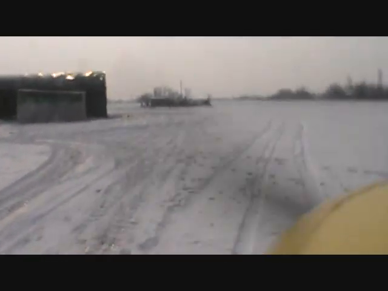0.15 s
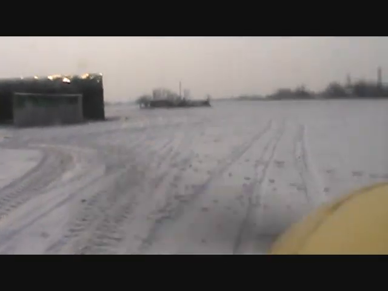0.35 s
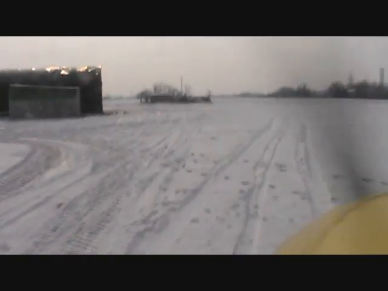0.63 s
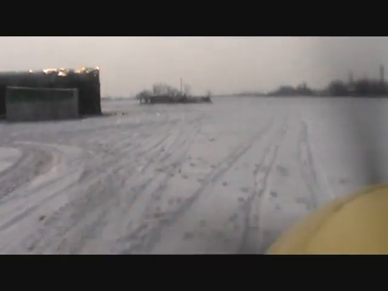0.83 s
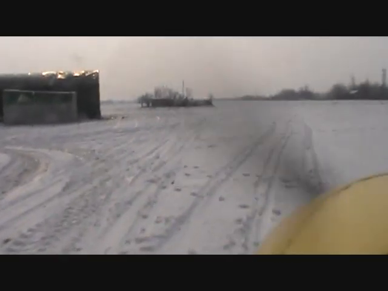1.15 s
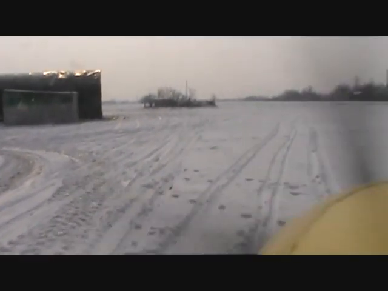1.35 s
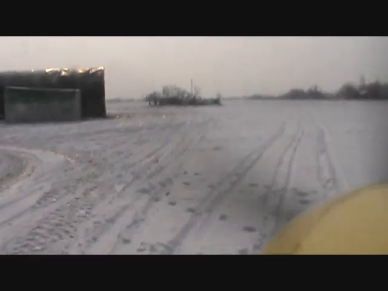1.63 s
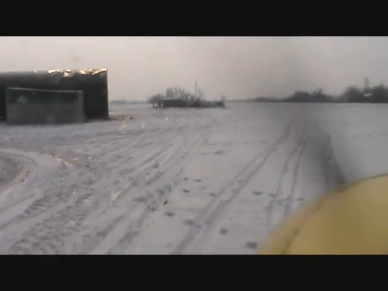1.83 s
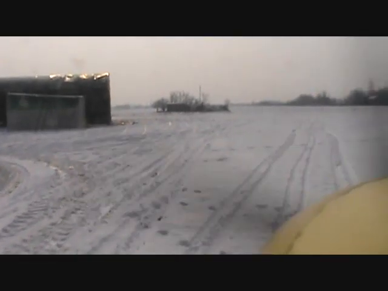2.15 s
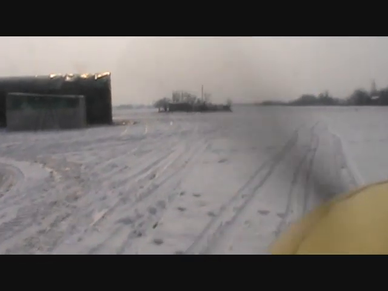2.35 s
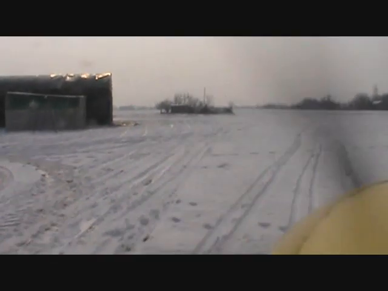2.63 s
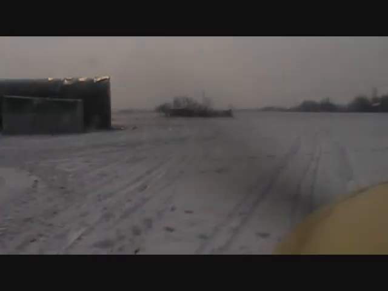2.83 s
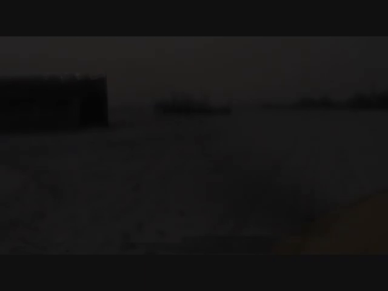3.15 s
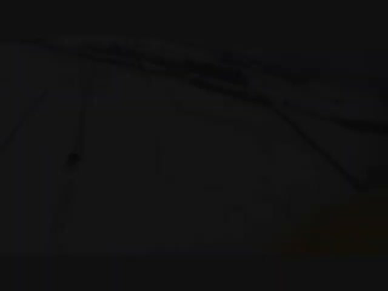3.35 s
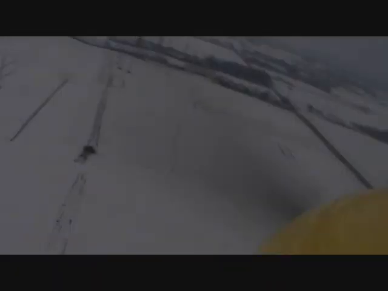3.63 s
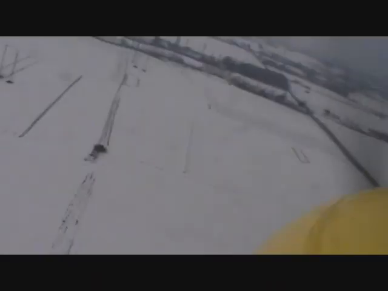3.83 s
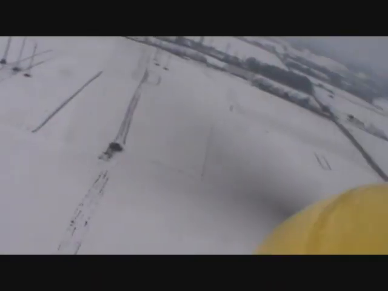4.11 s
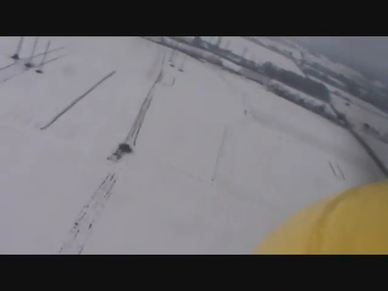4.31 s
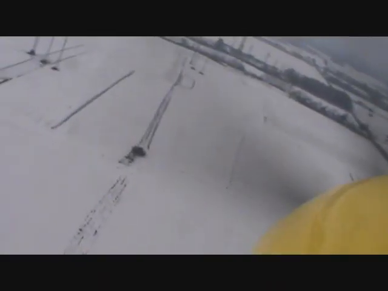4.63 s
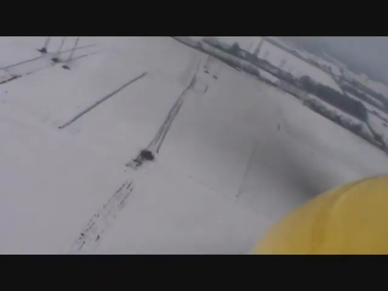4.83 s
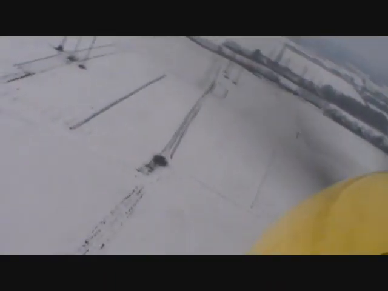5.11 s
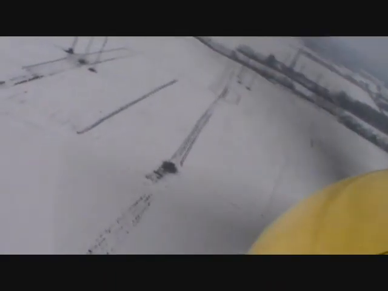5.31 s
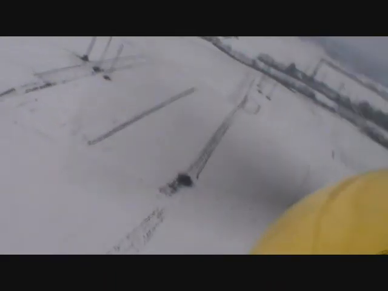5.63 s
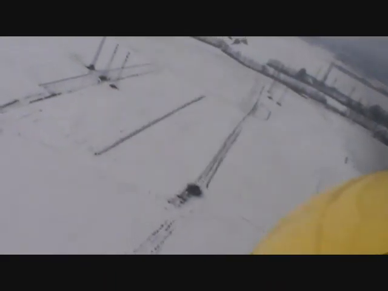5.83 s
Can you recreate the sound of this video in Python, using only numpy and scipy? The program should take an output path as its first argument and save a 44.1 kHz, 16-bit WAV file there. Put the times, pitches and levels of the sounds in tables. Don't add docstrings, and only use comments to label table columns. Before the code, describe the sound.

Inside a light aircraft standing on snow, the engine drones low and knocks the airframe while propeller wash roars. A loose metal bracket rattles in quick, irregular bursts. The sound fades and cuts to silence just after three seconds, then the engine fades in at higher pitch in flight, smoother and windier, with sparser rattles. Close stereo cockpit microphone with levelled loudness and slightly rounded peaks.

```python
import sys
import numpy as np
from scipy import signal
from scipy.fft import rfft, irfft, next_fast_len
from scipy.io import wavfile
from scipy.ndimage import uniform_filter1d, map_coordinates

SR = 44100
rng = np.random.default_rng(int(sys.argv[2]) if len(sys.argv) > 2 else 0)


def generate_wav(sig):
    pcm = np.round(np.clip(np.atleast_2d(sig).T, -1, 1) * 32767).astype(np.int16)
    wavfile.write(sys.argv[1], SR, pcm)


def invert_db(x):
    u = np.asarray(x, float) / 20
    return 10 ** u


N = 263276
GROUND, AIR = 0, 1
CUT_S = 3.1918

# (time [s], firing rate [Hz])
RUN_UP_SPEED = [(0.0, 61.32), (0.29, 61.06), (0.58, 62.93), (1.16, 65.35), (1.45, 65.89), (1.74, 65.88),
                (2.03, 65.3), (2.32, 65.21), (2.9, 66.0), (3.19, 66.1)]
# (time [s], firing rate [Hz])
FLIGHT_SPEED = [(3.45, 75.12), (4.17, 75.8), (4.53, 75.69), (4.88, 76.4), (5.24, 76.07), (5.6, 76.83),
                (5.96, 75.57)]


def unit(x):
    return x / np.sqrt(np.mean(x ** 2) + 1e-20)


def along(points, hz):
    f, v = np.transpose(points)
    return np.interp(np.log(hz + 1), np.log(f + 1), v)


def curves(rows, t_s):
    s, *cols = np.transpose(rows)
    return [np.interp(t_s, s, c) for c in cols]


def wobble(rate_hz):
    knots = rng.standard_normal(int(N * rate_hz / SR) + 4)
    return map_coordinates(knots, [np.arange(N) * rate_hz / SR])


def patches(shape, bins, frames):
    field = uniform_filter1d(rng.standard_normal(shape), bins, axis=0)
    return unit(uniform_filter1d(field, frames, axis=1))


def filtered(x, response):
    m = next_fast_len(N + SR // 4)
    return irfft(rfft(x, m) * response(np.fft.rfftfreq(m, 1 / SR)), m)[..., :N]


def modes(f, table):
    total = 0
    for k, (centre, width, db) in enumerate(table):
        damping = 1j * f * width
        total = total + (-1) ** k * invert_db(db) * damping / (centre * centre - f * f + damping)
    return total


def engine(view, t):
    # (multiple of firing rate [1], level [dB]); panels lift the high ones
    weak_orders = [
        [(.5, -25), (1.5, -17), (3, -19), (4, -25), (5, -21), (9, -23), (10, -27), (11.75, -28), (12.5, -27),
         (13, -28), (16, -33), (21, -35)],
        [(.5, -26), (.75, -15), (1.75, -24), (2.25, -22), (4.4, -21), (7.5, -26), (10.75, -27), (11, -24),
         (11.25, -25), (12, -32), (13, -32)],
    ]
    # (time [s], level [dB])
    second_swell = [
        [(0, -11.5), (1.9, -8.5)],
        [(4.4, -12), (5.6, -7)],
    ]
    # (knock level [dB], every second knock [dB], delay [firings])
    knocks = [
        (-19.5, -3.5, .3),
        (-25, 0, .3),
    ]
    # (centre [Hz], width [Hz], level [dB])
    airframe_modes = [(940, 200, -8), (1348, 54, 1.5), (1532, 120, 3.5), (1628, 86, 3.5)]
    first_db = (-6.5, -12.5)[view]
    start_turns = (.164, 1.556)[view]

    speed = (RUN_UP_SPEED, FLIGHT_SPEED)[view]
    rate_hz = curves(speed, t)[0]
    second_db = curves(second_swell[view], t)[0]
    turns = np.cumsum(rate_hz) / SR
    turns += start_turns - turns[round(speed[0][0] * SR)]

    def tone(order, db, lead_rad):
        level = np.sqrt(2) * invert_db(db + 0.89 * wobble(7.4))
        return level * np.cos(2 * np.pi * order * turns + lead_rad + 0.11 * np.sqrt(order) * wobble(10))

    drone = tone(1, first_db + .1, 0) + tone(2, second_db - .7 + 1.6 * wobble(14), 0.8)
    drone += sum(tone(order, db, rng.uniform(0, 2 * np.pi)) for order, db in weak_orders[view])

    knock_db, second_knock_db, delay = knocks[view]
    firing = np.floor(turns - delay).astype(int)
    scatter_db = rng.normal(0, 0.4, N // 300)[firing % (N // 300)]
    size = invert_db(scatter_db + second_knock_db * (firing % 2))
    since_firing_s = ((turns - delay) % 1) / rate_hz
    blow = size * invert_db(-60 * since_firing_s / 0.008)
    snap = 8 * size * np.diff(firing, prepend=firing[0])
    rough = rng.standard_normal(N) + 0.15 * rng.standard_normal((2, N))
    knock = filtered(snap + blow * rough, lambda f: modes(f, airframe_modes))
    return drone + invert_db(knock_db) * unit(knock)


def rush(response, patchy_db):
    z = signal.stft(rng.standard_normal((2, N + 512)), nperseg=512)[2]
    z *= invert_db(patchy_db * patches(z.shape[1:], 8, 5))
    return unit(filtered(signal.istft(z, nperseg=512)[1][:, :N], response))


def spread(pair):
    # (frequency [Hz], left-right correlation [1])
    alike = [(30, 0.93), (60, 0.66), (130, 0.51), (290, 0.66), (640, 0.44), (1410, 0.51), (3100, 0.58),
             (6820, 0.49), (15000, 0.61)]
    # (frequency [Hz], share of the difference that is the same sound drifting across [1])
    eddies = [(30, 0.79), (125, 0.8), (300, 0.96), (700, .6), (2000, .4), (6000, .2)]
    hz, _, (first, second) = signal.stft(pair, SR, nperseg=1024)
    turn_rad = np.arccos(np.clip(along(alike, hz), -1, 1))[:, None] / 2
    share = np.clip(along(eddies, hz), 0, 1)[:, None]
    drift = 1j * patches(first.shape, bins=9, frames=60)
    mid = np.cos(turn_rad) * first
    side = np.sin(turn_rad) * (share * drift * first + np.sqrt(1 - share ** 2) * second)
    return signal.istft(np.array([mid + side, mid - side]), SR, nperseg=1024)[1][:, :N]


def wash(view):
    # (frequency [Hz], density [dB per Hz])
    wash_colour = [
        [(12, -43.5), (22, -9), (60, -9.5), (110, -0.5), (200, -2), (400, -10.5), (600, -13), (740, -20.5),
         (1000, -17), (1200, -23.5), (1810, -29), (2900, -36), (4500, -40.5), (16000, -67)],
        [(12, -43), (22, -15.5), (65, -9), (120, -7), (216, -7), (400, -13), (590, -17.5), (760, -25),
         (1060, -26.5), (1760, -33.5), (2300, -34.5), (3340, -39.5), (9950, -43), (16000, -55.5)],
    ]
    # (frequency [Hz], density [dB per Hz])
    draught_colour = [
        [(3000, -3.5), (5000, -13.5), (7100, -2.5), (11800, -3.5), (16000, -17)],
        [(3000, -2), (5000, 4.5), (7500, -14.5), (10000, -11), (16000, -24)],
    ]
    # (centre [Hz], width [Hz], level [dB])
    FLIGHT_RING = [(6400, 700, -32.5), (8200, 500, -36), (9900, 1000, -33), (12100, 500, -37)]
    # (centre [Hz], width [Hz], level [dB])
    panel_modes = [
        [(473, 26, -22), (587, 58, -24), (689, 27, -24), (840, 9.9, -45.5), (840.6, 28, -20), (1113, 25, -34.5),
         (2860, 700, -31.5)],
        [(332.5, 23.0, -20.5), (607, 51, -19.5), (839, 44, -25.5), (917, 83, -26.5), (2670, 410, -24.5),
         (3050, 210, -28), (3880, 550, -30.5)] + FLIGHT_RING,
    ]
    draught_db = (-30, -25)[view]

    def singing(f):
        power = 0
        for centre, width, db in panel_modes[view]:
            power = power + invert_db(2 * db) / width * np.abs(modes(f, [(centre, width, 0)])) ** 4
        return np.sqrt(power)

    roar = rush(lambda hz: invert_db(along(wash_colour[view], hz)), patchy_db=1.5)
    roar = roar * invert_db(-1.0 + 0.25 * wobble(1.6) + 1.1 * wobble(25))
    panels = invert_db(-14.0 + 0.4 * wobble(12)) * rush(singing, patchy_db=1.0)
    flutter = invert_db(draught_db + 0.6 * wobble(35))
    draught = flutter * rush(lambda hz: invert_db(along(draught_colour[view], hz)), patchy_db=3.5)
    return spread(roar + panels + draught)


def whine(t):
    # (frequency [Hz], level [dB])
    generator_tones = [(3621, -36), (4363, -30.5)]
    # (start [s], end [s], level [dB])
    louder_spells = [
        (2.79, 2.9, -1),
        (2.955, 3.015, 3),
        (3.07, 3.2, 1.5),
    ]
    idle_db = -15.5
    whine_db = idle_db + sum((db - idle_db) * ((t > start) & (t < end)) for start, end, db in louder_spells)
    whine_db = uniform_filter1d(whine_db, size=800)
    total = 0
    for hz, db in generator_tones:
        level = invert_db(db + whine_db + .6 * wobble(12))
        total = total + level * np.sin(2 * np.pi * hz * t + .25 * wobble(10))
    return total


def contacts():
    # (first [s], last [s], first level [dB], last level [dB])
    ground_bouts = [(.183, .2409, -13.5, -18), (.3122, .3381, -15, -11), (2.0747, 2.1031, -20.5, -13),
                    (.4239, .4529, -25, -25), (.6, .6594, -17.5, -13), (.7547, .7894, -24, -40),
                    (.9572, .9916, -23, -18), (1.0051, 1.1578, -9.5, -12), (1.2052, 1.2351, -22, -23),
                    (1.3284, 1.3594, -22, -21), (1.3718, 1.4346, -8, -20), (1.4666, 1.498, -21, -15),
                    (1.4814, 1.5124, -18, -24.5), (1.5249, 1.5514, -10.5, -13), (1.7973, 1.8253, -21, -16),
                    (1.8567, 1.9195, -14, -21.5), (2.1331, 2.1964, -16.5, -24), (2.2278, 2.3156, -18, -17),
                    (2.3441, 2.3775, -14.5, -15.5), (2.6254, 2.6539, -17, -20), (2.8085, 2.8679, -29, -28),
                    (2.8968, 2.9272, -20.5, -24.5)]
    # (first [s], last [s], first level [dB], last level [dB])
    flight_bouts = [(3.6004, 3.708, -36, -37), (3.784, 3.815, -26, -32), (3.9691, 3.994, -24, -23),
                    (4.024, 4.082, -22, -26), (4.2105, 4.258, -23, -18.5), (4.656, 4.71, -15, -23),
                    (5.078, 5.103, -18, -12), (5.1329, 5.1614, -17.5, -26), (5.347, 5.38, -13, -21),
                    (5.529, 5.574, -19, -16), (5.7565, 5.7835, -13, -10)]
    # (first [s], last [s], first level [dB], last level [dB])
    limping_bouts = [(.8165, .8799, -8, -14), (1.5818, 1.7649, -12, -13), (2.4059, 2.4673, -16, -17.5),
                     (2.6833, 2.7472, -22.5, -22.5), (4.4211, 4.4719, -18, -14)]
    # (time [s], peak level [dB])
    strays = [(.0583, -16), (.1216, -24), (.3696, -9), (.4683, -15.5), (.6449, -13.5), (.7233, -9.5),
              (.2743, -27.5), (.9033, -26.5), (1.0214, -27), (1.0744, -22), (1.3443, -20), (1.4164, -18),
              (1.5964, -26), (2.612, -26), (2.9407, -25), (3.1308, -35), (3.4388, -43), (3.7296, -24),
              (4.5303, -19), (5.2871, -18), (5.8139, -26)]
    limp_db, limp_s = -6.5, 0.0043
    rows = list(strays)
    for bouts, limps in ((ground_bouts + flight_bouts, 0), (limping_bouts, 1)):
        for first, last, first_db, last_db in bouts:
            turns = round((last - first) * curves(RUN_UP_SPEED + FLIGHT_SPEED, first)[0] / 2)
            for k in range(turns + 1):
                late = limps * (k % 2)
                time_s = first + (last - first) * k / turns + late * limp_s
                rows.append((time_s, first_db + (last_db - first_db) * k / turns + late * limp_db))
    return rows


def rattle():
    # (centre [Hz], width [Hz], level [dB])
    bracket_modes = [(4004, 270, 0), (6080, 210, 1), (8200, 86, 4), (8570, 130, -1.5), (9500, 530, 6.5),
                     (11530, 120, 0), (12730, 130, -9), (12200, 440, 0)]
    # (time [s], peak level [dB])
    scrapes = [(.195, -19), (.2265, -21), (.298, -20), (0.605, -14), (.649, -18), (0.7747, -14),
               (0.789, -15), (1.385, -25), (1.775, -21), (1.93, -31.5)]
    strike_s, scrape_s = (0.00061, 0.0021), (.0035, 0.0051)
    size, lead_s = 4096, .008
    top_s = lead_s + 0.00085
    apart = .72
    shiver_t60_s = 0.1
    low_hz, low_width_hz, _ = bracket_modes[0]
    out, t = np.zeros((2, N + size)), np.arange(size) / SR
    f = np.fft.rfftfreq(size, 1 / SR)

    def swell(u, rise, fall):
        return np.exp(-(u / np.where(u < 0, rise, fall)) ** 2)

    events = [(*row, strike_s) for row in contacts()] + [(*row, scrape_s) for row in scrapes]
    for s, db, (rise, fall) in events:
        peak_db = db + rng.normal(0, 0.5)
        pan_db = rng.normal(1.5, 1.5)
        gaps_s, bounce_db = rng.uniform(.004, .01, 3), rng.normal(-21, 4, 3)

        chatter = swell(t - top_s, rise, fall)
        hardness = 3 * rng.random() ** 2 * (rise < .001)
        chatter += hardness * swell(t - top_s, .0001, .0001)
        for delay_s, b in zip(np.cumsum(gaps_s), bounce_db):
            chatter += invert_db(b) * swell(t - top_s - delay_s, 0.00064, 0.00058)
        shiver = 0.22 * invert_db(-60 * (t - top_s) / shiver_t60_s)
        lead_in = 0.28 * np.exp((t - top_s) / 0.0045)
        chatter += np.where(t > top_s, shiver, lead_in)

        shared, own = rng.standard_normal(size), rng.standard_normal((2, size))
        high = [(hz, 2.0 * width, level + rng.normal(0, 2.8)) for hz, width, level in bracket_modes[1:]]
        bright = modes(f, high) + invert_db(-3.5) * (f > 4500)
        ring = unit(irfft(rfft(chatter * (shared + apart * own)) * bright))
        low_mode = modes(f, [(low_hz * rng.normal(1, 0.014), 1.1 * low_width_hz, 0)])
        low = unit(irfft(rfft(chatter * own) * low_mode))
        hit = ring + invert_db(-4 - 2 * (s > CUT_S)) * low

        level = invert_db(peak_db - 1.84 + np.array([[pan_db], [-pan_db]]) / 2)
        start = round((s - lead_s) * SR)
        out[:, start:][:, :size] += level * hit / np.abs(hit.mean(axis=0)).max()
    return out[:, :N]


def squeezed(x):
    level = np.sqrt(np.abs(uniform_filter1d(np.mean(x ** 2, axis=0), size=3000))) + 0.018
    x = x * level ** -.4
    return x / (1 + np.abs(x / 1.89) ** 4) ** (1 / 4)


def scene():
    ground_db, flight_db = -12.5, -12
    fade_out_s, fade_out_length_s = 1.3, 2.12
    fade_in_s, fade_in_length_s, frame_s = 3.385, 1.974, .04
    t = np.arange(N) / SR
    fall = np.clip(1 - (t - fade_out_s) / fade_out_length_s, 0, 1)
    fall = invert_db(ground_db) * fall * (t < CUT_S)
    stepped_s = CUT_S + np.floor((t - CUT_S) / frame_s) * frame_s
    rise = np.clip((stepped_s - fade_in_s) / fade_in_length_s, 0, 1)
    rise = invert_db(flight_db) * uniform_filter1d(rise, size=60)
    ground = squeezed(engine(GROUND, t) + wash(GROUND) + whine(t))
    flight = squeezed(engine(AIR, t) + wash(AIR))
    return fall * ground + rise * flight + (fall + rise > 0) * rattle()


def low_pass(x):
    return signal.sosfilt(signal.butter(12, 16520, fs=SR, output="sos"), x)


def record(dry):
    # (frequency [Hz], left over right [dB])
    lean = [(40, -0.5), (150, -0.5), (400, -1.1), (800, 0), (2500, 0.3), (5000, -0.5), (9000, 0),
            (14000, -2)]
    top_hz, edge_hz = 15900, 180

    def ports(hz):
        balance = invert_db(along(lean, hz) * np.array([[.5], [-.5]]))
        return balance * np.clip((top_hz - hz) / edge_hz, 0, 1) ** 2

    return low_pass(filtered(dry, ports))


dry = scene()
out = record(dry)
generate_wav(out)
```